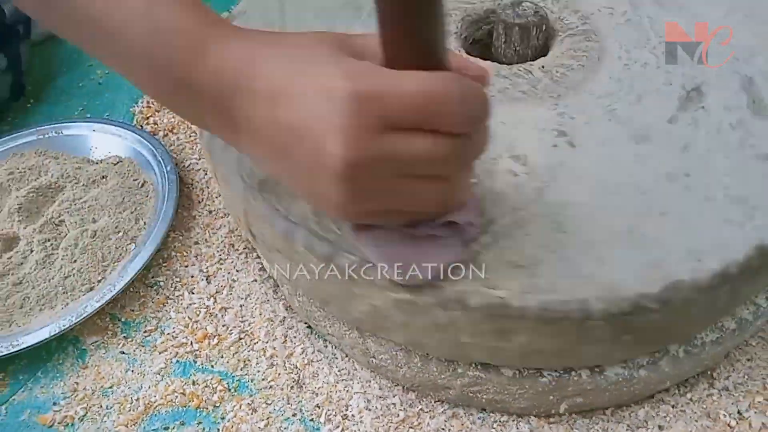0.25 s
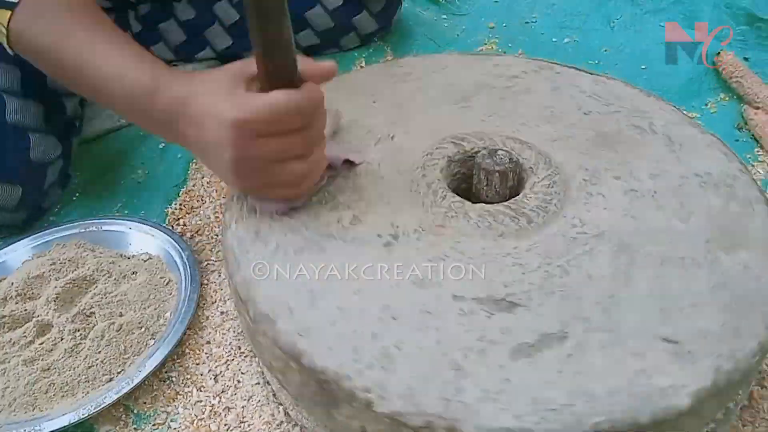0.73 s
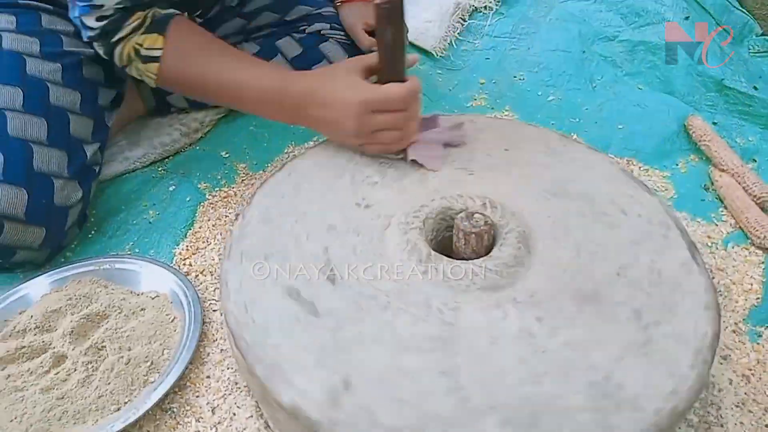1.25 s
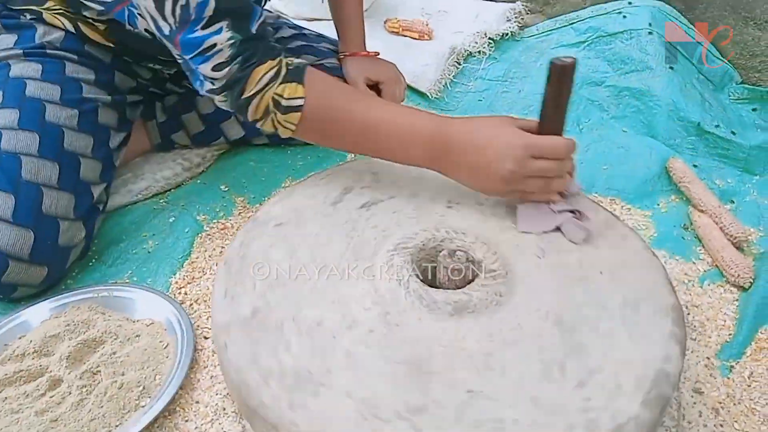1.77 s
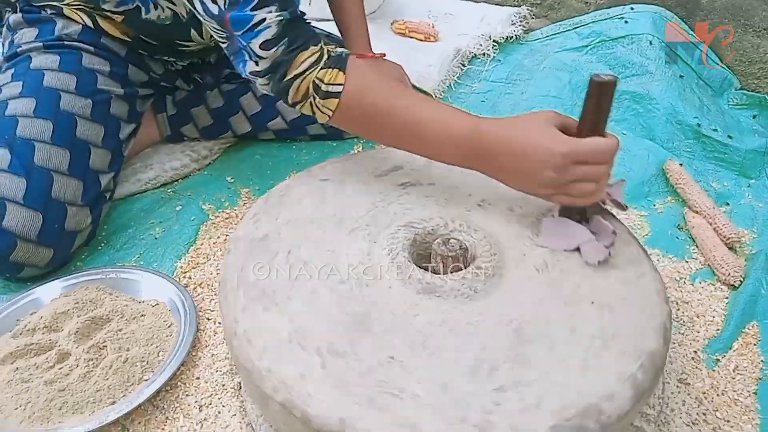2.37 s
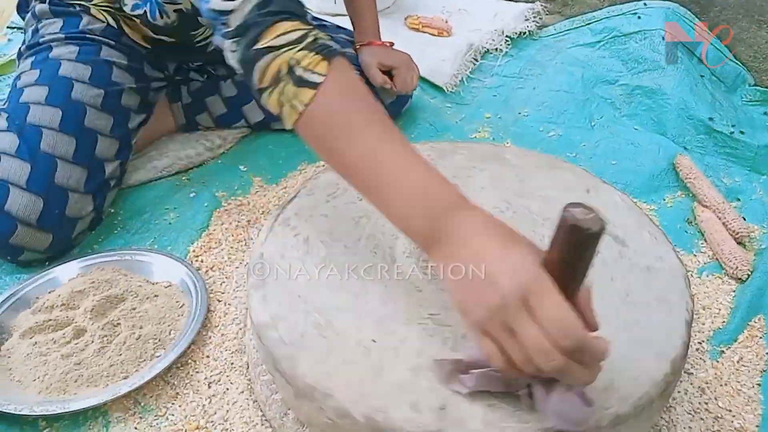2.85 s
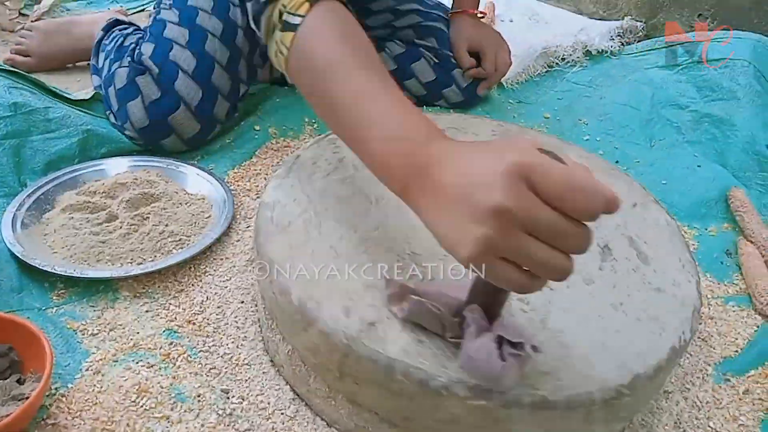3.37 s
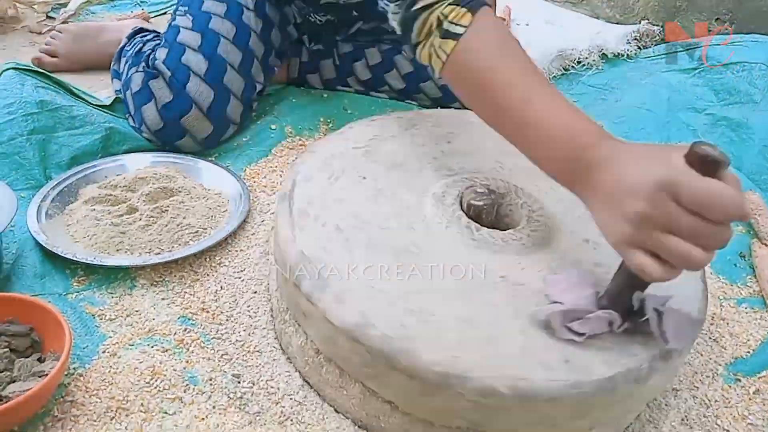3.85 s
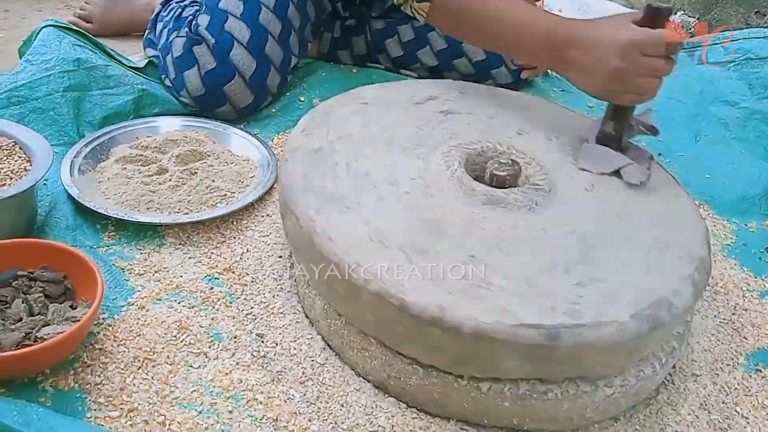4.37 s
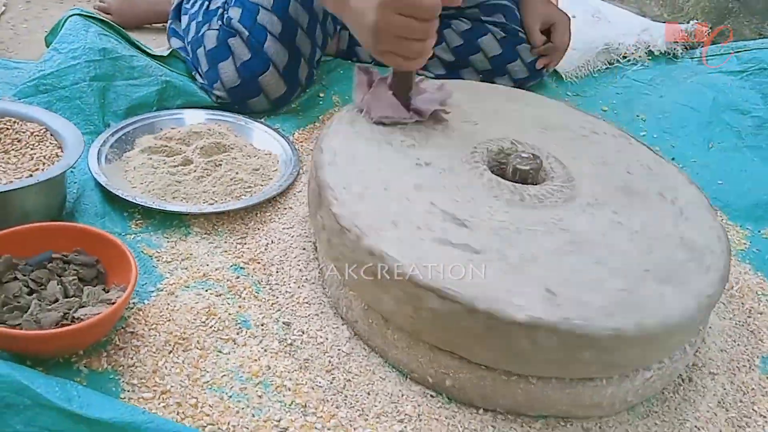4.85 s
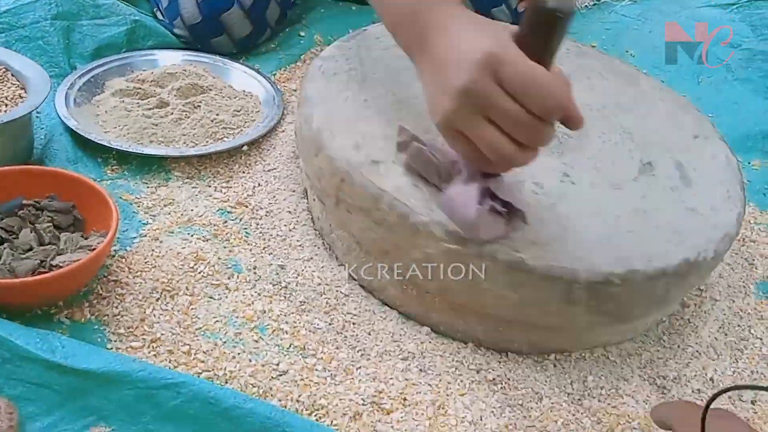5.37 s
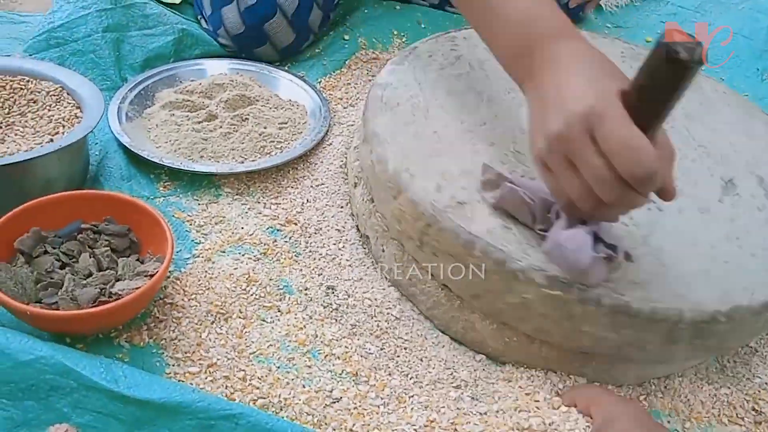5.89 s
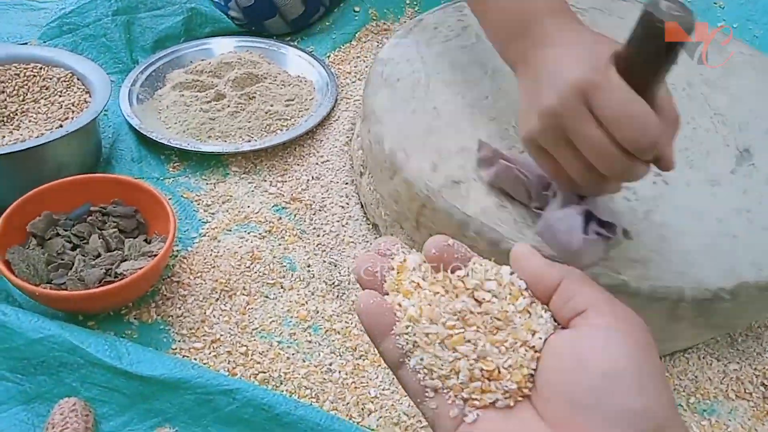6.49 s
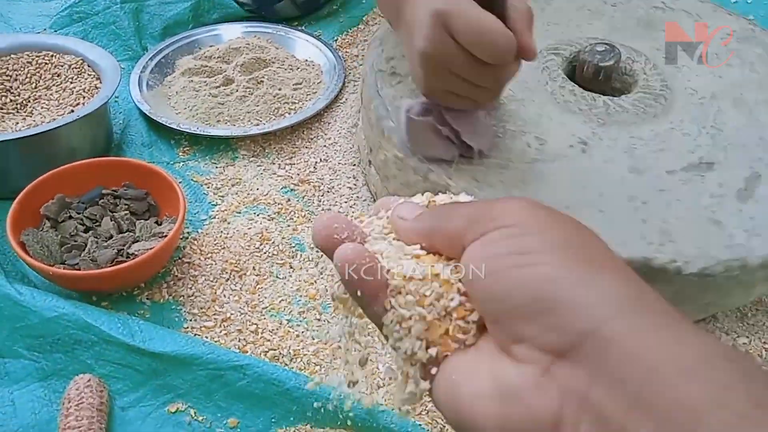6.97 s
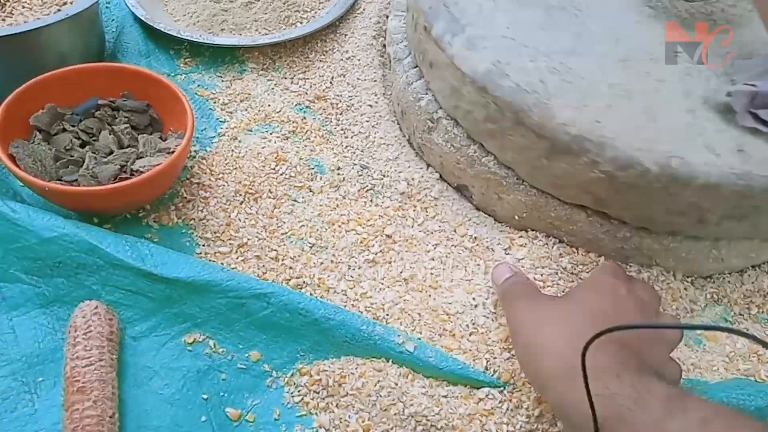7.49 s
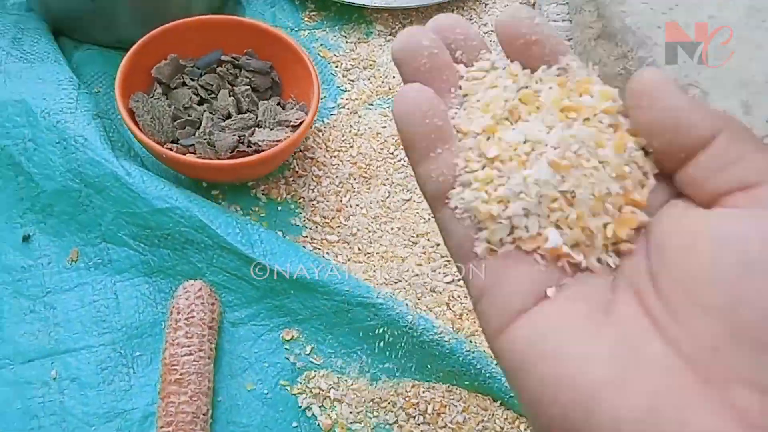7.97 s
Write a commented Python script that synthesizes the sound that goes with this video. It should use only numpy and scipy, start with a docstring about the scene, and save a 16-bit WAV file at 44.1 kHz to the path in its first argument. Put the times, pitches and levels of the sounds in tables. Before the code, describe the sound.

From 0 to 3.1 s, a very close, dry grinding of stone on grain: rough, jerky crunching in the low mids over a ground rumble, swelling about every 0.6 to 0.7 s as the handle goes round. Kernels burst in damped thuds, and grit pings thin stone tones around 1.3, 2 and 3 kHz. At 3.08 s the sound is cut hard to near silence, then fades back by about 3.27 s with a sharp tick and clink. The stone is a little farther off, slow and weaker, roughly one turn a second, building from 4 s. Hollow scrapes come at 4.4 and 5.4 s, and a tiny whistle slides down at 5.05 s. Between 5.8 and 8.2 s turning quickens and grows stronger, with frequent cracks, small squeaks, grain ticks and glassy bangle clinks, clearest near 7.9 s, over faint outdoor hiss.

```python
"""Hand-turned stone quern

Outdoors, a phone microphone close to a stone quern grinding grain, nearer still before the one hard cut.
Rubbing and breaking kernels drive filtered noise in the gap, a ground rumble and the upper stone's modes.
Cracks are damped thuds with ringing; grit pings, scrapes and squeaks; grain ticks; a bangle clinks.
One brief whistle slides down over a faint hiss. The sound is cut off once and fades back in."""
import sys
import numpy as np
from scipy import signal
from scipy.fft import rfft, irfft
from scipy.io import wavfile
from scipy.ndimage import uniform_filter1d, map_coordinates

SR = 44100
rng = np.random.default_rng(int(sys.argv[2]) if len(sys.argv) > 2 else 0)


def invert_db(level):
    """Linear amplitude ratio for a level in decibels (20 dB per decade), elementwise."""
    return 10 ** (np.asarray(level, dtype=float) / 20)


def bounce(signal):
    """Save signal as a 16-bit WAV file at the path given by the first command-line argument."""
    frames = np.transpose(np.atleast_2d(signal))
    limited = np.clip(frames, -1, 1)
    pcm = np.round(limited * 32767).astype(np.int16)
    wavfile.write(sys.argv[1], SR, pcm)


N = 363384
T = np.arange(N) / SR
CUT_S = 3.0838  # the hard cut; the microphone is nearer before it

# Levels in the tables are relative: each source scales its own.
# spectra of the crush in the gap, nearer and farther: (frequency [Hz], gain [dB])
CRUSH_NEAR = [(100, -71), (220, -21), (290, -6), (370, -1), (450, -4.5), (600, -2), (850, -7.5),
              (1000, -13), (1150, -10), (1300, -7.5), (1600, -19.5), (1900, -15.5), (2400, -29),
              (3300, -31), (5000, -94.5)]
CRUSH_FAR = [(100, -67), (220, -23), (290, -9), (350, -2), (430, -9), (520, -2.5), (600, 1.5), (680, -4.5),
             (790, -5.5), (880, -11.5), (1000, -15.5), (1150, -10.5), (1300, -17), (1700, -28),
             (2500, -41.5), (3300, -30.5), (5000, -93.5)]
# spectra of ground rumble, grit, husk fizz and air hiss: (frequency [Hz], gain [dB])
RUMBLE_SPECTRUM = [(15, -35.5), (40, -32.5), (60, -15.5), (100, -1.5), (145, 3), (200, -3), (260, -3.5),
                   (400, -37.5), (1000, -88)]
GRIT_SPECTRUM = [(1500, -63), (2800, -16.5), (3500, 8), (4050, 6.5), (4600, -1.5), (5300, -11),
                 (6000, -41.5), (9000, -82)]
FIZZ_SPECTRUM = [(3500, -51.5), (5400, -8), (6200, -2.5), (6700, 0.5), (6900, -3.5), (7400, -3.5),
                 (8200, -16), (10000, -23), (13000, -40)]
AIR_SPECTRUM = [(5000, -40.5), (8000, 3), (10500, -5), (11500, -1.5), (12300, -3), (13500, -0.5),
                (15500, -2)]
# spectrum of the bright snap of a grain tick: (frequency [Hz], gain [dB])
SNAP_SPECTRUM = [(4000, -23.5), (7000, 2.5), (10000, -4), (12000, -3), (15500, -7)]

# modes of the upper stone, by family: (frequency [Hz], width [Hz], level [dB])
FIRST = [(1320, 45, -12.5), (1356.4, 32.8, -0.5), (1386, 28, 1.5)]
SECOND = [(1991, 36, -1), (2009, 17, 2)]
THIRD = [(2958, 69, -0.5), (3135, 32, 4.5)]
FOURTH = [(4050, 55, -4), (4270, 50, -5), (4390, 40, 0), (4780, 81, -8), (5145, 45, -7.5),
          (5270, 40, -16.5)]
FIFTH = [(7280, 80, 0)]
# before the cut the stone is loaded differently, so three families sit elsewhere: same columns
SECOND_NEAR = [(1984, 40, 0), (2010, 40, -0.5)]
THIRD_NEAR = [(2940, 66, -1), (3120, 26, 4)]
FOURTH_NEAR = [(4060, 65, -7.5), (4400, 44, -4.5), (4760, 85, -2), (5100, 38, -1)]
# broad contact between the faces, weak far from a mode family: (frequency / first mode [ratio], gain [dB])
CONTACT = [(.2, -36), (0.698, 2.5), (1.3, -4), (3.001, -31.5), (8.001, -70.5)]

# angle of the handle; it stands just after the cut, then gathers speed: (time [s], angle [turns])
HANDLE = [(-0.23, 0), (0.43, 1), (1.1, 2), (1.69, 3), (2.3, 4), (3.08, 5), (3.09, 6), (4.04, 6), (5.0, 7),
          (5.87, 8), (6.64, 9), (7.38, 10), (8.03, 11), (8.3, 11.5)]
# how hard the stone is worked: (time [s], level [dB])
EFFORT = [(0, 2.5), (.8, 1), (1.5, 1.6), (2, -0.5), (2.6, -1.5), (3.08, -1.4), (3.3, -10), (3.7, -6),
          (4.1, -2.5), (4.5, -1), (5, -1), (5.4, -0.5), (5.8, 1.5), (6.3, 1.6), (6.9, 2), (7.5, 1.5),
          (7.85, 2), (8.05, 4.5), (8.24, 2)]
# loose husks between the faces: (time [s], level [dB])
HUSKS = [(0, 0.5), (1.5, .5), (3.08, -2), (3.4, -3), (4, 3), (4.45, 0), (5.1, 4), (5.5, -1.5), (6.8, -2),
         (8.2, 0.5)]
# uneven faces make each layer swell; per layer one row before the cut and one after:
# (level [dB], slope [dB per dB of effort], once-a-turn swell [dB], its peak [turns],
#  twice-a-turn swell [dB], its peak [turns])
SWELL = dict( crush=[(-21.5, 1, 2, .11, 0.63, 0.11), (-24, 1.01, 0.3, 0.05, 1.32, 0.014)],
         knock=[(0.4, -0.6, 1.5, .55, 0.8, 0.13), (-0.6, -0.36, 0, 0.4, -0.1, .01)],
         mouth=[(0.3, 0.3, 0.4, .1, 0, .1), (0.7, 0.43, 3.5, 0.0, -0.5, .01)],
         rumble=[(-33, 1.25, 1.5, .07, .9, 0.24), (-31, 0.44, 1.1, -.42, 1.76, 0.075)],
         first=[(-23, 0.1, 1.2, 0.063, 0.8, 0.23), (-30, 1.16, 1.5, .05, 0, .24)],
         second=[(-38.5, -1, 5, -.1, 1.5, .24), (-38, 0.78, 1.5, 0.05, 2.5, 0.0069)],
         third=[(-38.5, 0.7, 2.5, .01, 0.5, 0.25), (-40, 0.97, 2.5, .01, 2, .01)],
         grit=[(-52, 0.7, -0.3, .09, 0, .14), (-52.5, 0.4, 0.5, -0.013, 0.2, .01)],
         fourth=[(-57, 0.5, .5, .09, 0.5, .14), (-57.5, 1, 0.8, 0.01, 1.6, .01)],
         fizz=[(-57.5, 0.3, 0.7, .04, 0.5, .19), (-63.5, 0.2, 0.5, .05, 1, -.05)],
         hiss=[(-68.5, 1.2, 0.5, .42, -0.7, .2), (-74.5, 1.6, 0.5, .15, 0.2, -.05)])
# the rumble thickens or thins for a moment: (time [s], length [s], change [dB])
LURCHES = [(.15, .25, -0.5), (1.2, 0.14, 0), (1.45, 0.39, -4.5), (3.9, .5, 1.5), (4.3, .15, -4.5),
           (4.85, 0.21, -3.5), (5.75, 0.11, -2), (6.7, 0.21, -4), (7.15, 0.16, 3), (8.2, 0.27, -4)]
# brief changes of the first, second and third rings: (time [s], length [s], change [dB])
FIRST_DULLS = [(1.37, 0.15, -3.5), (2.0, 0.11, 0), (3.4, .2, -1), (4.6, 0.13, -4), (5.45, 0.13, -4),
               (6.3, 0.099, -6), (6.47, 0.073, -11), (7.82, 0.13, -7)]
SECOND_FLARES = [(.27, 0.1, 5), (.95, .2, 3), (1.65, 0.18, 3), (1.95, 0.23, -11), (2.14, .1, 4.5),
                 (2.95, .2, 2.5), (3.23, .08, -3), (3.4, 0.16, 3), (3.57, 0.14, -10.5), (4.28, 0.069, -3),
                 (4.7, 0.083, 3.5), (4.8, .08, -7), (5.0, 0.28, 2.5), (5.6, 0.22, -5), (6.1, 0.42, 2),
                 (6.44, 0.092, -5), (6.9, 0.45, -6), (7.35, 0.24, -3), (7.55, 0.36, -0.5)]
THIRD_GLINTS = [(.08, 0.22, -5), (.49, .1, 2), (.7, .06, -6), (1.05, .12, 2.5), (1.28, .08, -4.5),
                (1.42, .05, -3), (2.19, .12, -2.5), (2.32, .08, 4.5), (2.76, 0.13, -4), (3.42, 0.091, -3.5),
                (3.59, 0.087, -3.5), (4.28, .08, -2), (4.82, .1, -4), (4.97, 0.11, 3), (5.5, .07, -6),
                (8.06, .1, 4)]

# kernels that crack loudly: (time [s], level [dB], thud pitch [Hz])
CRACKS = [(0.101, -10, 360), (0.269, -17, 611), (0.302, -12.5, 611), (0.461, -5, 380), (0.615, -9, 545),
          (0.641, -6, 614), (0.942, -8.5, 397), (0.991, -11, 374), (1.079, -11, 587), (1.144, -2.5, 660),
          (1.167, -8.5, 600), (1.226, -7.5, 388), (1.452, -14, 490), (1.716, -8, 511), (1.784, -7, 778),
          (1.815, -9, 611), (2.001, -10, 533), (2.159, -15, 380), (2.209, -13, 533), (2.298, -9, 630),
          (2.326, -7.5, 517), (2.408, -11.5, 360), (2.766, -10, 417), (2.91, -11.5, 503), (3.04, -11, 406),
          (3.392, -15, 600), (3.501, -15.5, 621.3), (3.606, -16, 600), (3.701, -12, 700), (3.853, -15, 540),
          (3.908, -11.5, 900), (4.02, -8, 530), (4.146, -6.5, 705), (4.329, -11.5, 786), (4.36, -12, 614),
          (4.819, -12, 564), (4.868, -11.5, 552), (4.949, -11, 595), (5.372, -8.5, 900), (5.435, -10, 850),
          (5.547, -9, 855), (5.743, -10, 720), (5.8, -7, 576), (5.963, -5, 554), (5.998, -4.5, 623),
          (6.182, -3, 590), (6.529, -8, 594), (6.678, -3.5, 600), (6.853, -8.5, 556), (7.0, -8, 614),
          (7.205, -4.5, 645), (7.316, -4.5, 680), (7.435, -3.5, 616), (7.619, -11, 600), (7.949, -7, 700)]
# grit striking the stone, pinging its first modes, or its second nearer the rim: (time [s], level [dB])
PINGS = [(0.045, -7.5), (0.178, -10), (0.225, -11), (0.2703, -3.5), (0.304, -7), (0.4633, -10.5),
         (0.5102, -8), (0.9413, -6.5), (0.975, -8), (1.066, -10), (1.1552, -6), (1.2491, -4.5),
         (1.574, -10.5), (1.7224, -5.5), (1.79, -4), (1.878, -8), (2.092, -9.5), (2.355, -10.5),
         (2.382, -11), (2.4399, -12), (2.556, -9.5), (2.718, -10), (2.824, -10), (2.9156, -11),
         (4.239, -17), (5.5462, -15.5), (5.8022, -14), (5.9976, -11), (6.0583, -16), (6.3794, -14),
         (6.6872, -13), (7.3183, -12.5), (7.9089, -12), (7.9828, -10)]
RIM_PINGS = [(0.2692, -17), (1.0419, -23), (1.6311, -16), (1.7125, -19.5), (2.1115, -16), (2.2666, -22),
             (2.4901, -20), (3.3517, -20), (3.4133, -18), (3.649, -25), (3.908, -13.5), (4.1483, -16),
             (4.8802, -20), (4.966, -19), (5.7447, -17), (5.8223, -16), (5.9637, -17), (6.2247, -23),
             (6.3215, -22.5), (7.209, -25), (7.7093, -24), (7.9722, -20), (8.1747, -17.5)]
# short hollow scrapes: (time [s], length [s], level [dB])
SCRAPES = [(0.796, 0.058, -25.5), (4.4, 0.13, -28), (5.41, 0.15, -26.5), (6.445, 0.079, -35),
           (7.99, 0.094, -33)]
# grit pinched between the faces: (time [s], level [dB], frequency [Hz])
SQUEAKS = [(3.648, -45, 4020), (4.8802, -42, 4030), (5.0514, -39, 4220), (5.1791, -43, 4050),
           (5.3272, -38, 3810), (5.74, -42, 4410), (5.815, -44, 4370), (5.9618, -40, 4370),
           (6.005, -40, 4070), (6.0955, -40.5, 4390), (6.632, -41, 4390), (6.6772, -41, 3750),
           (7.088, -41, 4230), (7.1491, -43, 4000), (7.207, -39, 4390), (7.3566, -42, 4380),
           (7.4414, -40, 4200), (7.7841, -41, 4070)]
# dry ticks of grain on the sheet: (time [s], snap level [dB], body level re snap [dB])
TICKS = [(0.123, -40, 4), (0.2106, -38, 7), (0.2282, -41.5, 11.5), (0.3985, -44, 5), (0.4399, -44, 5),
         (0.5018, -45, 8), (0.6736, -38, 0), (0.801, -40.5, 12), (0.8924, -55, 11), (1.3467, -42, 15),
         (1.371, -46.5, 14), (1.5244, -46, 5), (1.5486, -45, 12), (1.7462, -43, 5), (1.783, -44.5, 12.5),
         (1.9031, -47, 5), (1.9959, -44, 8), (2.4117, -44, -1), (2.9716, -48.5, 16), (3.2545, -45.5, 21),
         (3.2778, -33, 16), (3.9071, -54.5, 28), (3.9822, -40, 16), (4.0517, -45, 6), (4.206, -48, 3),
         (4.367, -40, 16), (4.4697, -45, 3), (4.5074, -46, 10), (4.5512, -56, 19), (5.1417, -47, 5),
         (5.3528, -52, 25), (6.003, -44, 11), (6.318, -38, 13), (6.3812, -41.5, 8), (6.6787, -47, 5),
         (6.872, -42, 8), (6.9052, -43, 13.5), (7.0449, -41, 3), (7.2554, -43, 10), (7.6054, -41, 0),
         (7.6195, -46, 5), (7.7854, -50, 21.5), (7.8984, -39.5, 19.5), (7.9516, -34.5, 9.5),
         (7.9674, -44, 5), (8.0964, -41.5, 8)]
# bangle clinks: (time [s], level [dB])
CLINKS = [(3.276, -31), (3.6136, -42), (4.338, -34), (5.3257, -46), (5.3518, -35.5), (5.5034, -47),
          (5.6211, -45), (6.9167, -44), (7.0455, -39.5), (7.257, -46), (7.619, -45), (7.7877, -47),
          (7.8996, -31), (7.9683, -42), (8.0669, -41), (8.098, -37)]
# modes of the bangle: (frequency [Hz], level [dB], 60 dB decay time [s])
BANGLE = [(5900, -3, .025), (6180, 0, .03), (6500, -1, .025)]
# the one chirp: (time [s], frequency [Hz], level [dB])
CHIRP = [(5.02, 3410, -61), (5.03, 3520, -38), (5.038, 3450, -39), (5.046, 3240, -29), (5.056, 2930, -34),
         (5.064, 2740, -40), (5.075, 2290, -56.5)]
# fine sheen at the very top of the hiss: (time [s], level [dB])
SHEEN = [(0, -84), (3.08, -84), (3.3, -83.5), (3.9, -79), (4.4, -79.5), (5, -80), (5.6, -81), (6.2, -86),
         (8.24, -85.5)]
# gain after the cut; the last value holds to the end: (time [s], gain [dB])
FADE = [(3.084, -55), (3.098, -90.5), (3.125, -72), (3.186, -52), (3.194, -38), (3.24, -17), (3.252, -8),
        (3.273, 4.5)]


def unit(x):
    """Scale to rms 1."""
    return x / np.sqrt(np.mean(x ** 2))


def curve(points):
    """Straight lines through (time, value) rows."""
    return np.interp(T, *np.transpose(points))


def bumps(events):
    """Sum of bell-shaped swells, one per (time, length, height) row."""
    return sum(height * np.exp(-(2 * (T - s) / length) ** 2) for s, length, height in events)


def impulses(events):
    """One spike per (time, level) row."""
    x = np.zeros(N)
    s, db = np.transpose(events)
    x[(s * SR).astype(int)] = invert_db(db)
    return x


def walk(rate):
    """Random levels held 1 / rate s and slewed twice, without slow drift; spread 1."""
    hold = int(SR / rate)
    steps = np.repeat(rng.standard_normal(N // hold + 1), hold)
    x = uniform_filter1d(uniform_filter1d(steps, hold), hold)[:N]
    return unit(x - uniform_filter1d(x, SR // 6))


def grains(rate, spread_db):
    """Random clicks, rate per second, most small and a few large, with a ceiling on size."""
    hit = rng.random(N) < rate / SR
    size = np.minimum(rng.exponential(size=N), 4.6)
    return unit(hit * rng.choice([-1., 1.], N) * invert_db(spread_db * size))


def colour(x, points, size=4096):
    """Causal minimum-phase filter through (frequency, gain) rows, from the cepstrum of the log gain."""
    hz, db = np.transpose(points)
    bins = np.fft.rfftfreq(size, 1 / SR)
    cepstrum = irfft(np.log(invert_db(np.interp(np.log(bins + 1), np.log(hz), db))))
    # fold the cepstrum onto positive time
    cepstrum[1:size // 2] *= 2
    cepstrum[size // 2 + 1:] = 0
    return signal.fftconvolve(x, irfft(np.exp(rfft(cepstrum))))[:N]


def ring(x, modes, flip=-1):
    """Sum of resonators, each weighted by a further factor of flip; a negative flip alternates the sign."""
    return sum(flip ** k * invert_db(db) * signal.lfilter(*signal.iirpeak(hz, hz / width, SR), x)
               for k, (hz, width, db) in enumerate(modes))


def family(force, modes, flip=1):
    """Modes driven through the broad contact, which is weak far from the first of them."""
    contact = [(ratio * modes[0][0], db) for ratio, db in CONTACT]
    return colour(ring(force, modes, flip), contact)


def either(force, near, far, flip):
    """One set of modes before the cut, another after, as the load on the stone differs."""
    return np.where(T < CUT_S, unit(family(force, near, flip)), unit(family(force, far, flip)))


def wander(x):
    """The moving contact detunes a ring: a varying delay strays its pitch a little, up and down."""
    late = np.cumsum(walk(30)) * 0.0018  # typical pitch change as a share
    late = late - uniform_filter1d(late, SR // 2)
    return map_coordinates(x, [np.arange(N) - late], mode="mirror")


def swell(layer):
    """Level of a layer in dB from effort and the angle of the handle over the uneven faces."""
    columns = np.transpose(SWELL[layer])
    db, slope, once_db, once, twice_db, twice = (np.where(T < CUT_S, *c) for c in columns)
    turns = curve(HANDLE)
    once_a_turn = once_db * np.cos(2 * np.pi * (turns - once))
    twice_a_turn = twice_db * np.cos(4 * np.pi * (turns - twice))
    return db + slope * curve(EFFORT) + once_a_turn + twice_a_turn


def quern():
    """One jerky contact force of rubbing and breaking kernels drives the gap, the ground and the stone."""
    force = contact_force()
    sound = gap_crush(force) + ground_rumble(force) + stone_rings(force) + grit_and_husks(force)
    # a hard kernel holds the faces apart just before it bursts, so the level dips
    hold_s, hold_db = 0.015, -3
    holds = [(s - hold_s / 2, hold_s, hold_db) for s, _, _ in CRACKS]
    return invert_db(bumps(holds)) * sound


def contact_force():
    """The load jerks as kernels catch and give way, heard in all bands together."""
    jerk = 0.75 * walk(22) + 2.07 * walk(70)
    breaking = grains(600., 2.86)

    def force(share, jerky, own_db):
        """Rubbing noise with a share of breaking kernels, the common jerk and a flicker of its own."""
        rub = rng.standard_normal(N) + share * breaking
        return rub * invert_db(jerky * jerk + own_db * walk(25))

    return force


def gap_crush(force):
    """Crushing noise in a gap that opens and closes in places, so narrow regions come and go alone."""
    crush = force(0.94, 0.34, 0.5)
    gap = np.where(T < CUT_S, unit(colour(crush, CRUSH_NEAR)), unit(colour(crush, CRUSH_FAR)))
    gap = gap + sum((invert_db(0.9 * walk(20)) - 1) * ring(gap, [(hz, hz / 5, 0)])
                    for hz in 280 * 1.25 ** np.arange(7))
    # two bands of the gap swell on their own
    knock = (invert_db(swell("knock")) - 1) * ring(gap, [(360, 87, 0.0018)])
    mouth = (invert_db(swell("mouth")) - 1) * ring(gap, [(750, 190, 0)])
    return invert_db(swell("crush")) * (gap + knock + mouth)


def ground_rumble(force):
    """The ground under the quern answers the contact force with low noise."""
    rumble = unit(colour(force(.4, 0.48, 0.47), RUMBLE_SPECTRUM))
    return invert_db(swell("rumble") + bumps(LURCHES)) * rumble


def stone_rings(force):
    """The upper stone rings on four families of modes, the lower three straying in pitch."""
    first = unit(wander(family(force(0.75, 0.27, 0.31), FIRST, -0.94)))
    second = wander(either(force(0.89, 0.49, 1.5), SECOND_NEAR, SECOND, 0.98))
    third = wander(either(force(0.8, 0.31, 0.54), THIRD_NEAR, THIRD, 0.99))
    high_force = ring(force(1.1, 0.28, 1.3), [(5000, 3000, 0)])
    fourth = either(high_force, FOURTH_NEAR, FOURTH, -1.03)
    return (invert_db(swell("first") + bumps(FIRST_DULLS)) * first
            + invert_db(swell("second") + bumps(SECOND_FLARES)) * second
            + invert_db(swell("third") + bumps(THIRD_GLINTS)) * third
            + invert_db(swell("fourth")) * fourth)


def grit_and_husks(force):
    """Grit rubs as mid-treble noise; husks snap in narrow treble patches, each flickering alone."""
    grit = force(0.96, 0.2, 0.67)
    husks = sum(ring(force(.6, .4, 2.0), [(hz, 700, 0)]) for hz in range(5400, 9000, 700))
    # the grit also rings the fifth mode of the stone
    fizz = unit(husks) + invert_db(-15.5) * unit(ring(grit, FIFTH))
    return (invert_db(swell("grit")) * unit(colour(grit, GRIT_SPECTRUM))
            + invert_db(swell("fizz") + curve(HUSKS)) * unit(colour(fizz, FIZZ_SPECTRUM)))


def cracks():
    """A hard kernel bursts: a thud of a few cycles in the gap, and the stone rings after it."""
    t = T[:SR // 40]
    thud = np.zeros(N + len(t))
    for s, db, hz in CRACKS:
        i = int(s * SR)
        envelope = t * hz / 2.0 * np.exp(-t * hz / 0.89)
        thud[i:i + len(t)] += invert_db(db + 11.5) * envelope * np.sin(2 * np.pi * hz * t)
    blow = impulses(np.array(CRACKS)[:, :2])
    return (thud[:N] + invert_db(25.5) * family(blow, FIRST, -1.1)
            + invert_db(17) * family(blow, SECOND) + invert_db(14.0) * family(blow, THIRD))


def pings():
    """Grit strikes the stone: single blows ring the first modes, or the second nearer the rim."""
    single = impulses([(0, 0)])
    first_peak = np.abs(family(single, FIRST, -1)).max()
    second_peak = np.abs(family(single, SECOND)).max()
    return (invert_db(-3.5) * family(impulses(PINGS), FIRST, -0.91) / first_peak
            + invert_db(-5.0) * family(impulses(RIM_PINGS), SECOND) / second_peak)


def scrapes():
    """Coarse grit dragged through a hollow of the gap: rough noise through one resonance."""
    drag = rng.standard_normal(N) * invert_db(3.2 * walk(40)) + grains(300., 2.6)
    hollow = [(856, 87, 0)]  # Hz, width Hz, dB
    strokes = bumps([(s, length, invert_db(db)) for s, length, db in SCRAPES])
    return strokes * unit(family(ring(drag, hollow), hollow))


def squeaks():
    """Grit pinched between the faces: brief narrow tones that swell and fade."""
    t = T[:SR // 20]
    rise_s = .003  # it fades in about five times that
    envelope = t / rise_s * np.exp(1 - t / rise_s)
    out = np.zeros(N + len(t))
    for s, db, hz in SQUEAKS:
        i = int(s * SR)
        out[i:i + len(t)] += invert_db(db) * envelope * np.sin(2 * np.pi * hz * t)
    return out[:N]


def ticks():
    """Grain falls on the sheet: short decaying bursts of noise, a bright snap and a duller body."""
    s, db, body_db = np.transpose(TICKS)
    noise = rng.standard_normal(N)

    def bursts(levels, decay_s):
        """Noise under an exponential decay from each tick."""
        decay = np.exp(-T[:SR // 50] / decay_s)
        return signal.fftconvolve(impulses(np.c_[s, levels]), decay)[:N] * noise

    snap = colour(bursts(db, .0016), SNAP_SPECTRUM)
    body = family(bursts(db + body_db, .0028), [(2960, 10000, 0.0014)])
    return invert_db(-6.0) * snap + invert_db(3.5) * body


def bangle():
    """Small glassy modes that die within a thirtieth of a second, a little different each time."""
    t = T[:SR // 10]
    pitch_scatter, level_scatter_db = .012, 2.5  # from clink to clink; pitch as a share
    # the strike lasts a moment, so the ring swells in
    onset = np.minimum(t / 0.00083, 1)
    out = np.zeros(N + len(t))
    for (s, clink_db), chance in zip(CLINKS, rng.standard_normal((len(CLINKS), 6))):
        clink = np.zeros(len(t))
        for k, (hz, db, t60) in enumerate(BANGLE):
            decay = invert_db(db + level_scatter_db * chance[k + 3] - 60 * t / t60)
            clink += decay * np.sin(2 * np.pi * hz * (1 + pitch_scatter * chance[k]) * t)
        i = int(s * SR)
        out[i:i + len(t)] += invert_db(clink_db - 5.0) * clink * onset
    return out[:N]


def chirp():
    """A clean whistle that slides down after a slight rise: one sine of gliding pitch."""
    s, hz, db = np.transpose(CHIRP)
    phase = 2 * np.pi * np.cumsum(np.interp(T, s, hz)) / SR
    return invert_db(np.interp(T, s, db, left=-150, right=-150)) * np.sin(phase)


def air():
    """Faint hiss with sparse tiny ticks of scattered grain, and a flickering sheen on top."""
    hiss = rng.standard_normal(N) * invert_db(1.5 * walk(17)) + .45 * grains(70., 3.3)
    sheen = ring(rng.standard_normal(N) * invert_db(3.0 * walk(120)), [(13300, 1400, 0)])
    return (invert_db(swell("hiss") + .3 * curve(HUSKS)) * unit(colour(hiss, AIR_SPECTRUM))
            + invert_db(curve(SHEEN)) * unit(sheen))


def scene():
    """All sources, close and dry, in one channel."""
    grinding = quern() + cracks() + pings() + scrapes() + squeaks()
    around = ticks() + bangle() + chirp() + air()
    return (grinding + around)[None, :]


def band_limit(x):
    """A steep low-pass at the top of the band."""
    return signal.sosfilt(signal.butter(12, 15550, fs=SR, output="sos"), x)


def record(dry):
    """A gain curve cuts the sound off hard once and fades it back in."""
    edit = np.where(T < CUT_S, 1, invert_db(curve(FADE)))
    edit = uniform_filter1d(edit, SR // 1500)  # softens the edge of the cut
    return band_limit(dry * edit)


dry = scene()
out = record(dry)
bounce(out)
```